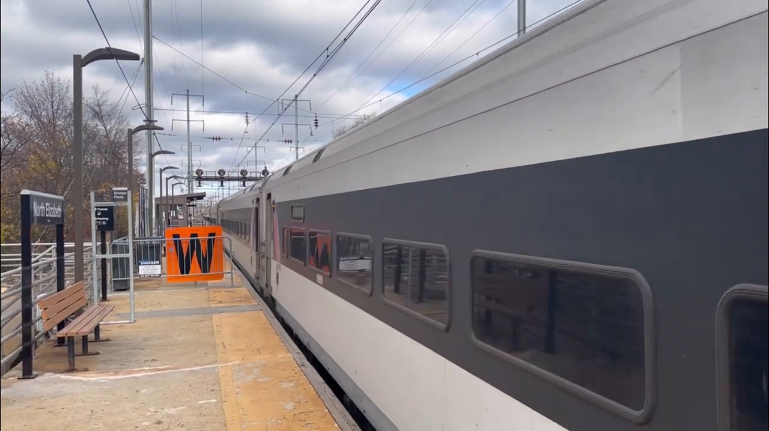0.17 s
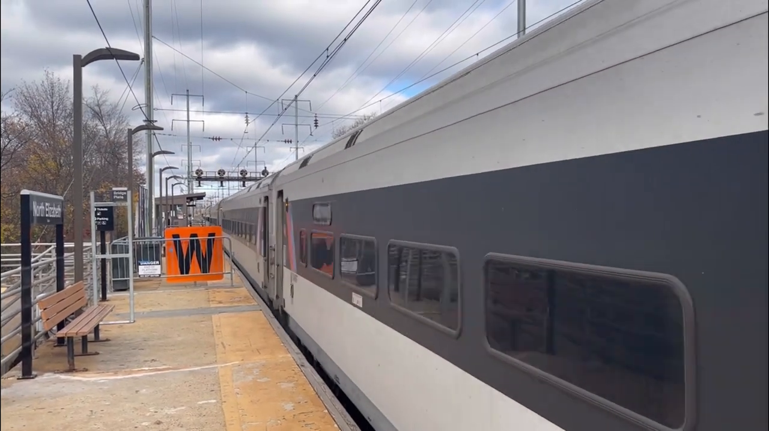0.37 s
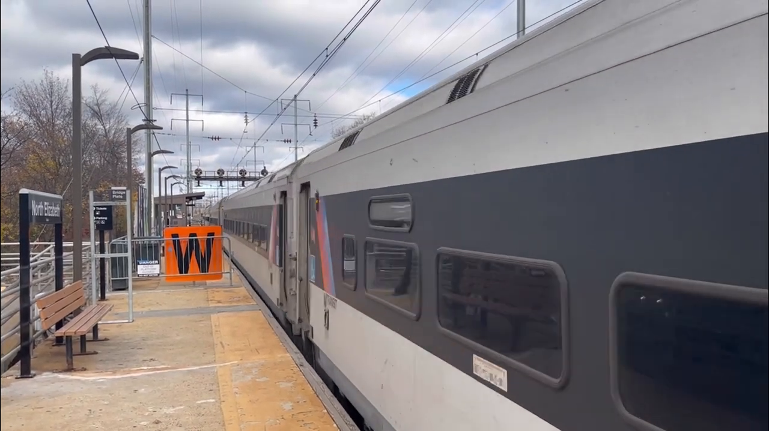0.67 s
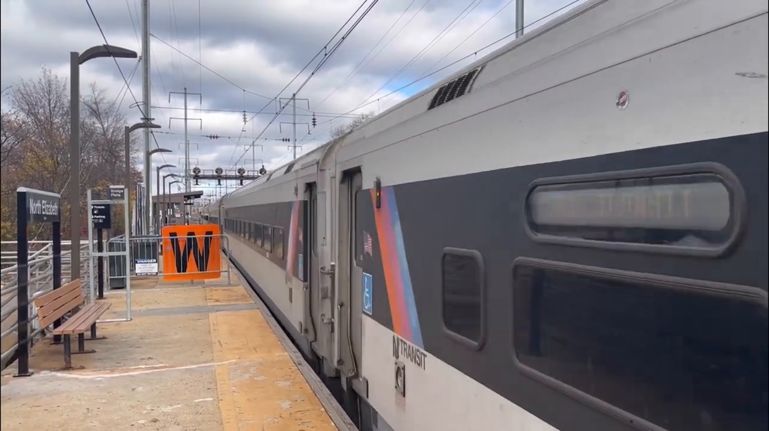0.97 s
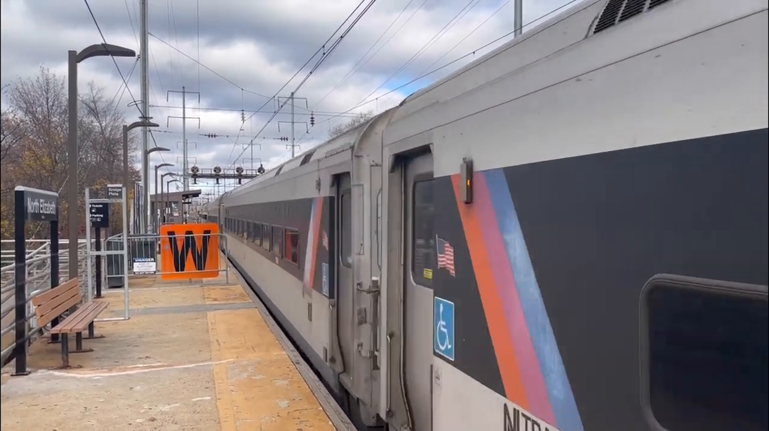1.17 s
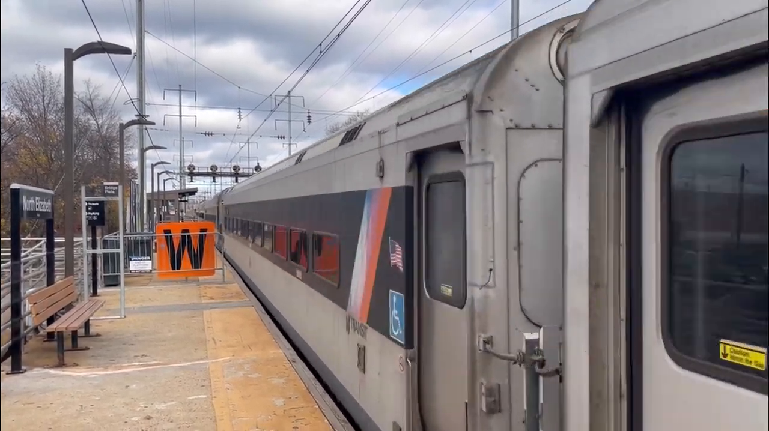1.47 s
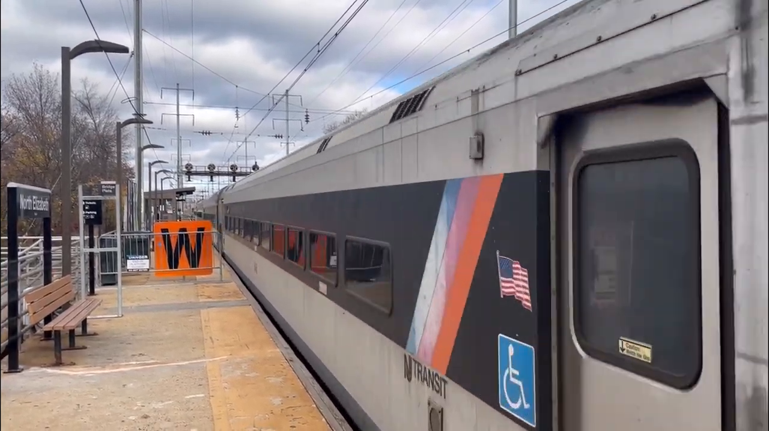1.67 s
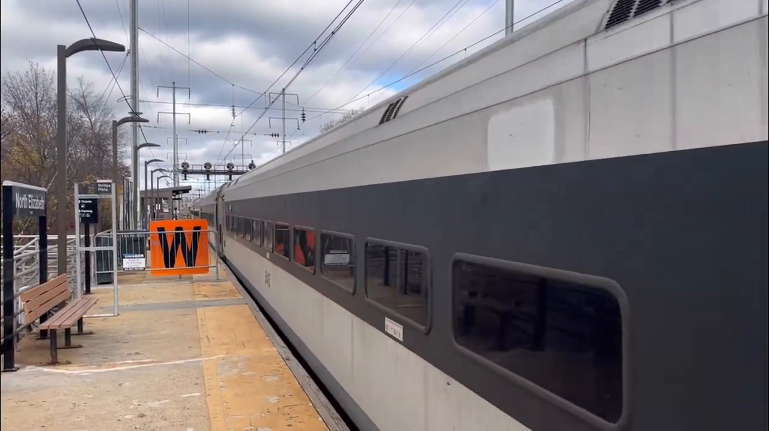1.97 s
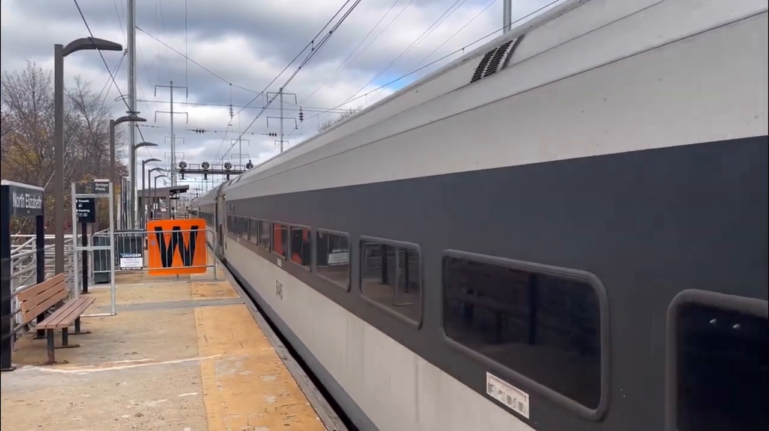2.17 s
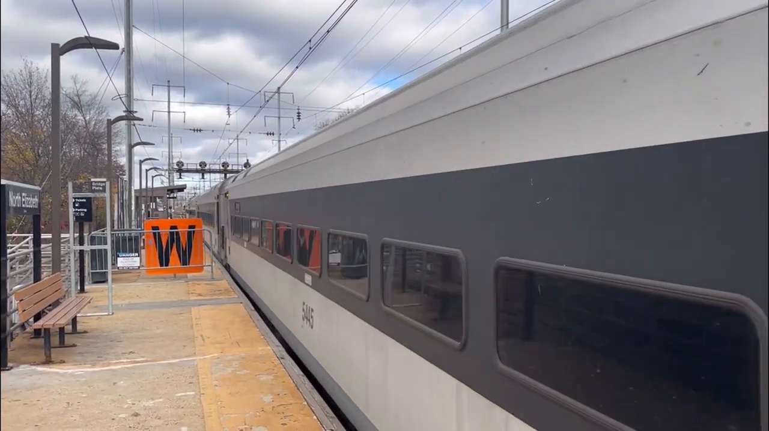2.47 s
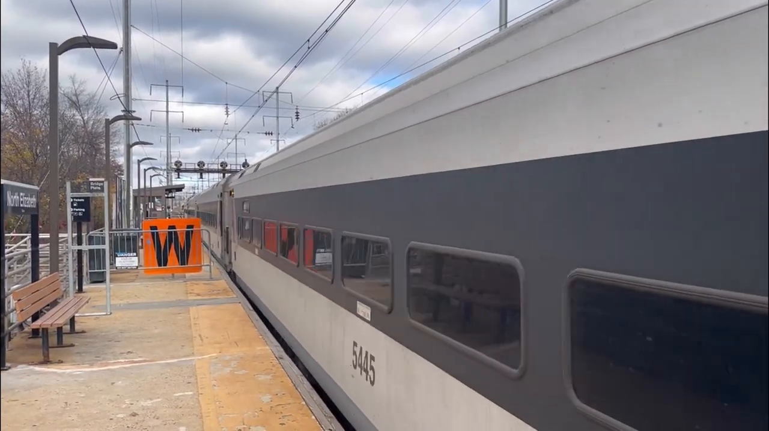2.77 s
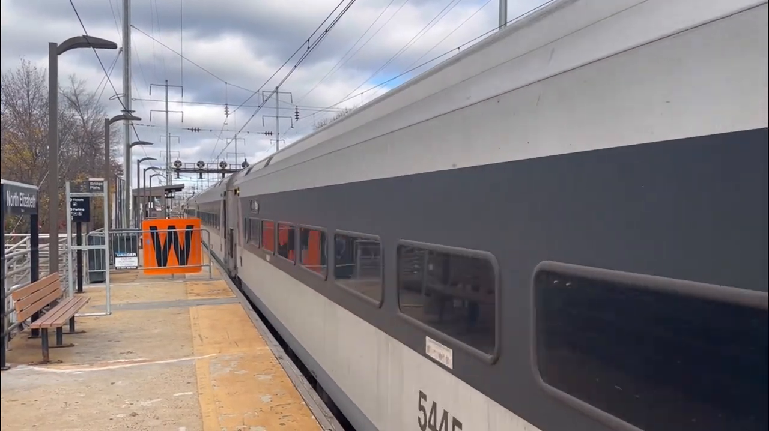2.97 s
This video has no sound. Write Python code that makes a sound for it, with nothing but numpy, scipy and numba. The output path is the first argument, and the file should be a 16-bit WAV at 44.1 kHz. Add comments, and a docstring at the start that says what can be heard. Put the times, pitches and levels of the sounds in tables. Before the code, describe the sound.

A passenger train rolls close by, rumbling and thumping, with a faint high squeal.

```python
"""On a station platform, a passenger train rolls close past a phone. Rolling contact makes wheels and rails
roar, and a worn wheel strikes the rail in thumps. Passing gear hisses, some blows clank and ring briefly,
slipstream eddies buffet the microphone, and friction raises a rough, high squeal that glides up, fades and
returns."""
import sys
import numpy as np
from scipy import signal
from scipy.fft import rfft, irfft, next_fast_len
from scipy.io import wavfile
from scipy.ndimage import uniform_filter1d
from numba import njit

SR = 44100
rng = np.random.default_rng(int(sys.argv[2]) if len(sys.argv) > 2 else 0)


def transcribe(signal):
    """Save signal, clipped to [-1, 1], as a 16-bit WAV file at the path in sys.argv[1]."""
    frames = np.atleast_2d(signal).T
    limited = np.clip(frames, -1, 1)
    pcm = np.round(limited * 32767).astype(np.int16)
    wavfile.write(sys.argv[1], SR, pcm)


N = 136710
FFT_SIZE = next_fast_len(N + 4096)


def undb(db):
    """Decibel law: amplitude grows tenfold every 20 dB."""
    return 10 ** (np.asarray(db) / 20)


def unit_rms(x):
    """Normalisation to unit power."""
    return x / np.sqrt(np.mean(x ** 2))


def on_log(table, hz):
    """Interpolation of (Hz, value) points on a logarithmic frequency axis."""
    points_hz, values = np.array(table, float).T
    return np.interp(np.log(hz + 1), np.log(points_hz + 1), values)


@njit
def resonator(x, hz, width_hz):
    """Second-order resonance: a state-variable band-pass with unit gain at its moving centre."""
    y, band_state, low_state = np.empty(len(x)), 0., 0.
    for i in range(len(x)):
        gain, damping = np.tan(np.pi * hz[i] / SR), width_hz / hz[i]
        band = (band_state + gain * (x[i] - low_state)) / (1 + gain * (gain + damping))
        band_state = 2 * band - band_state
        low_state += 2 * gain * band
        y[i] = damping * band
    return y


def noise_band(hz, width_hz, size):
    """Resonant filtering: white noise passes twice through a resonance; rms 1."""
    centre_hz = np.clip(np.ones(size) * hz, 20, .45 * SR)
    once = resonator(rng.standard_normal(size), centre_hz, float(width_hz))
    return unit_rms(resonator(once, centre_hz, float(width_hz)))


def wander(per_s):
    """Random modulation: Gaussian values joined smoothly; rms 1."""
    step = SR / per_s
    values = rng.standard_normal(int(N // step) + 2)
    joined = np.interp(np.arange(N) / step, np.arange(len(values)), values)
    return unit_rms(uniform_filter1d(joined, int(step)))


def add(out, x, start_s):
    """Superposition: x adds to out from start_s on."""
    i = max(int(start_s * SR), 0)
    out[i:i + len(x)] += x[:len(out) - i]


# Anchor frequencies of the roar: pitch_hz
ROAR_ANCHORS_HZ = (65, 150, 320, 680, 2200, 9000)
# Course of the roar, taken relative to each column's mean: time_s, then level_db at each anchor
ROAR_LEVELS = [(0.0, -30, -38.5, -34.5, -35, -39, -59), (0.35, -38.5, -29.5, -40.5, -33.5, -41, -56.5),
               (0.73, -30.5, -27.5, -34.5, -34, -37, -52.5),
               (1.03, -31.5, -30.5, -26.5, -32.5, -37.5, -50.5), (1.26, -34.5, -24.5, -28, -32, -37, -51.5),
               (1.48, -35, -34, -31.5, -38.5, -37.5, -54.5), (1.69, -33.5, -30.5, -37.5, -36.5, -39, -55.5),
               (1.86, -31.5, -31.5, -32, -34, -36.5, -58), (2.02, -31, -29.5, -27, -35.5, -39.5, -60),
               (2.3, -33.5, -33, -41.5, -38.5, -42, -63), (2.65, -39.5, -28.5, -37, -36.5, -42, -63),
               (2.9, -33.5, -30.5, -39, -36, -43, -64.5), (3.1, -34, -35, -38, -38.5, -41.5, -64)]


def roar_envelopes(t):
    """Amplitude modulation: half-octave bands swell, flicker and dip as the wheel unloads before blows."""
    rows = np.array(ROAR_LEVELS, float)
    offsets_db = rows[:, 1:] - rows[:, 1:].mean(axis=0)
    swell_db = 2.2 * np.tanh(wander(per_s=14))
    lead_s, dip_s = .015, .013
    unloading = sum(np.exp(-.5 * ((t - blow[0] + lead_s) / dip_s) ** 2) for blow in WHEEL_BLOWS)
    envelopes = []
    for hz in 20 * 2 ** (np.arange(20) / 2):
        band_db = [on_log(list(zip(ROAR_ANCHORS_HZ, row)), hz) for row in offsets_db]
        course_db = np.interp(t, rows[:, 0], band_db)
        dip_db = -2 * unloading / (1 + hz / 2500)  # the treble dips and flickers less
        flicker_db = 1.5 * np.tanh(wander(per_s=20)) / (1 + hz / 3000)
        envelopes.append(undb(course_db + swell_db + dip_db + flicker_db))
    return envelopes


# Spectral density of the roar: frequency_hz, relative_db
ROAR_SPECTRUM = [(12, -43), (20, -32), (46, -0.5), (64, -0.5), (126, -0.5), (201, -3.5), (266, -5),
                 (342, -8), (491, -13.5), (534, -14), (745, -16.5), (857, -19.5), (1410, -26), (1580, -23),
                 (1970, -31), (2210, -31), (5230, -41), (6010, -41), (8160, -42.5), (9380, -42.5),
                 (12100, -63), (13800, -55.5), (15500, -72)]
# Resonances of wheel and rail steel: pitch_hz, width_hz, rise_db
STEEL_MODES = [(116, 22, 1.5), (247, 32, 2), (494, 40, 6), (1694, 30, 6.5), (2282, 52, 5), (3084, 80, 6.5),
               (3990, 180, 4.5)]


def rolling_roar(envelopes):
    """Broadband excitation: rolling contact drives the resonances of wheel and rail."""
    hz = np.fft.rfftfreq(FFT_SIZE, 1 / SR)
    modes_db = sum(db / (1 + (2 * (hz - pitch) / width) ** 2) for pitch, width, db in STEEL_MODES)
    spectrum = rfft(rng.standard_normal(FFT_SIZE)) * undb(on_log(ROAR_SPECTRUM, hz) + modes_db)
    spectrum *= undb(-23) / np.std(irfft(spectrum, FFT_SIZE))
    band_index = np.clip(2 * np.log2(np.maximum(hz, 20) / 20), 0, len(envelopes) - 1)
    out = np.zeros(N)
    for k, envelope in enumerate(envelopes):
        weight = np.clip(1 - abs(band_index - k), 0, 1)
        out += envelope * irfft(spectrum * weight, FFT_SIZE)[:N]
    return out


# Blows of the worn wheel: start_s, relative_db, pitch_hz, clank_over_body_db, decay_s
WHEEL_BLOWS = [(0.11, -24.5, 266, 0, 0.058), (0.223, -19, 244.6, -5, 0.051), (0.343, -21, 276, -3.5, 0.045),
               (0.482, -14.5, 140.4, -13, 0.048), (0.517, -17.5, 163, -9.5, 0.074),
               (0.661, -22, 221, -2.5, 0.038), (0.759, -19, 124, -6, 0.058),
               (0.803, -16.5, 168.4, -6, 0.052), (0.888, -19, 182, -3.5, 0.047),
               (0.94, -14, 254.5, -10, 0.04), (1.033, -11, 172.5, -11.5, 0.036),
               (1.074, -10, 218, -10, 0.034), (1.172, -15, 216, -1.5, 0.03),
               (1.334, -6.5, 162, -12.5, 0.031), (1.352, -11.5, 297, -13, 0.031),
               (1.379, -10.5, 151, -12, 0.042), (1.43, -11, 222, -16, 0.024), (1.464, -20, 121, -2.5, 0.03),
               (1.532, -11.5, 152, -21, 0.037), (1.633, -13, 281, -12.5, 0.051),
               (1.672, -15.5, 277, -4.5, 0.036), (1.789, -14, 117, -10, 0.063),
               (1.894, -16, 123.4, -24, 0.08), (1.969, -18, 121, -5, 0.047), (2.004, -18, 255, -10, 0.03),
               (2.104, -12.5, 125.5, -15.5, 0.027), (2.318, -15.5, 207, -18, 0.06),
               (2.457, -20, 121, -15.5, 0.042)]


def wheel_thumps(tone_share):
    """Impact excitation: each blow shakes the bogie at its pitch, with a brighter clank on top."""
    out, t = np.zeros(N), np.arange(SR // 4) / SR
    attack_s = .0028
    for start_s, db, hz, clank_db, decay_s in WHEEL_BLOWS:
        envelope = np.clip(t / attack_s, 0, 1) * np.exp(-(t / decay_s) ** 2)
        tone = np.sqrt(2 * tone_share) * np.sin(2 * np.pi * hz * t)
        thud = np.sqrt(1 - tone_share) * noise_band(hz, .65 * hz, len(t))
        clank = undb(clank_db) * noise_band(hz=600, width_hz=420, size=len(t))
        add(out, .5 * undb(db) * envelope * (tone + thud + clank), start_s)
    return out


# Hisses of passing gear, and the narrow rings that clank after wheel blows: peak_s, level_db, centre_hz,
# width_hz, spread_s
GEAR_HISSES = [(.84, -55, 8500, 6000, .025), (.94, -53, 9000, 8000, .04), (.93, -53, 9500, 2500, .14),
               (.91, -45, 2800, 2800, .045), (1.11, -52, 7500, 7000, .025), (.69, -46, 2800, 2400, .045),
               (.53, -32, 600, 120, .03), (1.195, -32, 770, 110, .03), (1.2, -52, 3850, 450, .08),
               (1.44, -41, 1280, 90, .035), (1.675, -38, 1150, 130, .025), (1.48, -46, 2550, 200, .025),
               (1.48, -47, 3100, 200, .025), (1.49, -32, 770, 70, .025), (1.71, -52, 8500, 5000, .025),
               (1.836, -42, 4200, 3500, .015), (1.836, -34, 1300, 300, .012), (1.832, -38, 2750, 900, .012)]


def gear_hisses():
    """Bandwidth sets timbre: broad noise bursts hiss, narrow ones ring; all swell and die evenly."""
    out, t = np.zeros(N), np.arange(-SR // 5, SR // 5) / SR
    for peak_s, db, hz, width_hz, spread_s in GEAR_HISSES:
        envelope = np.exp(-.5 * (t / spread_s) ** 2)
        add(out, undb(db) * envelope * noise_band(hz, width_hz, len(t)), peak_s + t[0])
    return out


# Slipstream eddies: centre_s, peak_db, pitch_hz
EDDIES = [(1.008, -10, 81), (1.9, -12.5, 101), (2.07, -19, 69), (2.181, -15.5, 153), (2.221, -12, 93.4),
          (2.36, -12.5, 65.4), (2.531, -14.5, 63), (2.711, -8, 91), (2.745, -7.5, 107), (2.775, -9.5, 78),
          (2.978, -14, 74.5)]


def slipstream_buffets():
    """Turbulent pressure: each eddy hits the microphone as a low pulse of about one cycle."""
    out, t = np.zeros(N), np.arange(-SR // 25, SR // 25) / SR
    spread_cycles = .34
    for centre_s, db, hz in EDDIES:
        envelope = np.exp(-.5 * (t * hz / spread_cycles) ** 2)
        add(out, -undb(db) * envelope * np.cos(2 * np.pi * hz * t), centre_s + t[0])
    return out


# Glide of the squeal: time_s, pitch_hz, level_db
SQUEAL_GLIDE = [(1.05, 4550, -64), (1.1, 4680, -51), (1.22, 5000, -52), (1.34, 5450, -49.5),
                (1.55, 6050, -47), (1.585, 6130, -64), (1.71, 6250, -52), (1.8, 6400, -62),
                (2.03, 6700, -61), (2.2, 6750, -63), (2.35, 6500, -68), (2.5, 6250, -57), (2.62, 6100, -58),
                (2.69, 6030, -52), (2.82, 6080, -48), (2.95, 6050, -54), (3.02, 6150, -51),
                (3.1, 6150, -53)]


def friction_squeal(t):
    """Friction-excited vibration: a narrow gliding noise band, roughened by a fast beat."""
    time_s, hz, db = np.array(SQUEAL_GLIDE, float).T
    level_db = np.interp(t, time_s, db, left=-120) + 1.5 * wander(per_s=24.7)
    beat_hz, beat_depth = 105, .4
    beat = 1 + beat_depth * np.sin(2 * np.pi * beat_hz * t)
    return undb(level_db) * beat * noise_band(np.interp(t, time_s, hz), width_hz=360, size=N)


# Likeness of left and right channels, wide in the middle range and nearly mono in the highest hiss:
# frequency_hz, coherence (0 to 1)
CHANNEL_COHERENCE = [(30, .5), (130, 0.8), (290, 0.89), (640, .58), (1400, 0.61), (2500, 0.35), (4000, 0.4),
                     (6500, 0.23), (8200, 0.67), (10200, .88), (12000, .8)]
# Phase between the two microphone ports: frequency_hz, left_lead_rad
PORT_LEAD = [(0, 0), (600, -.5), (1720, -2), (2500, 1.1), (3190, 1.63), (4050, 0.5), (4740, 0.8),
             (6200, -1.3), (7600, 4), (8700, 2.5), (10400, -0.5)]
# Balance of the ports: frequency_hz, left_minus_right_db
PORT_LEVELS = [(60, 1.7), (110, -0.5), (200, -0.5), (380, 0.5), (700, -1), (1290, 1), (2380, -0.5),
               (4400, 2), (8120, 1.5), (15000, -1)]


def stereo_image(shared, opposed):
    """Partial coherence: left and right carry one sound alike and another with opposite signs."""
    hz = np.fft.rfftfreq(FFT_SIZE, 1 / SR)
    coherence = np.clip(on_log(CHANNEL_COHERENCE, hz), 0, 1)
    tilt = undb(on_log(PORT_LEVELS, hz) / 2) * np.exp(.5j * on_log(PORT_LEAD, hz))
    mid, side = (rfft(np.pad(x, (0, FFT_SIZE - N), "reflect")) for x in (shared, opposed))
    mid *= np.sqrt((1 + coherence) / 2)
    side *= np.sqrt((1 - coherence) / 2)
    left, right = (mid + side) * tilt, (mid - side) / tilt
    return irfft([left, right], FFT_SIZE)[:, :N]


def scene():
    """Superposition of sources: only the shared sound carries the thumps' tones and the buffets."""
    t = np.arange(N) / SR
    envelopes = roar_envelopes(t)
    shared, opposed = (
        rolling_roar(envelopes) + wheel_thumps(tone_share) + gear_hisses() + friction_squeal(t)
        for tone_share in (.42, 0))
    return stereo_image(shared + slipstream_buffets(), opposed)


def record(dry):
    """Band limiting and saturation: the phone drops deep bass, rounds peaks and cuts the top."""
    bass_cut_hz, ceiling, top_hz = 25.5, .8, 15720
    x = signal.sosfilt(signal.butter(2, bass_cut_hz, "high", fs=SR, output="sos"), dry)
    x = ceiling * np.tanh(x / ceiling)
    return signal.sosfilt(signal.ellip(14, .3, 60, top_hz, fs=SR, output="sos"), x)


dry = scene()
out = record(dry)
transcribe(out)
```